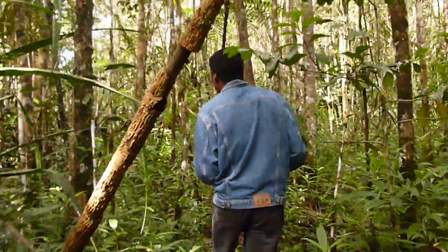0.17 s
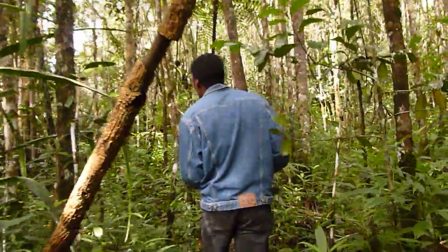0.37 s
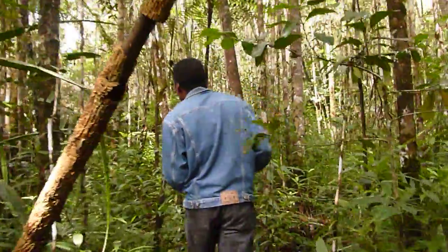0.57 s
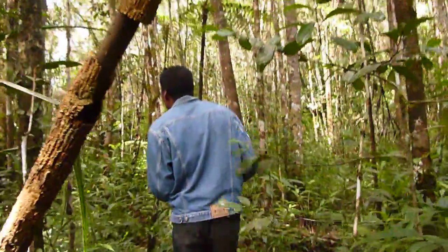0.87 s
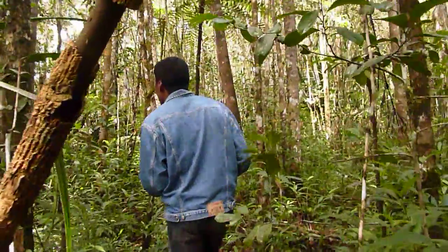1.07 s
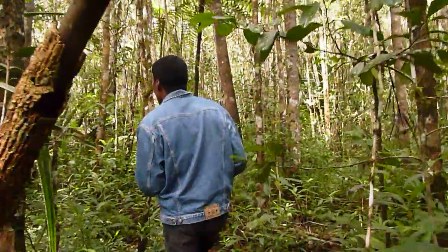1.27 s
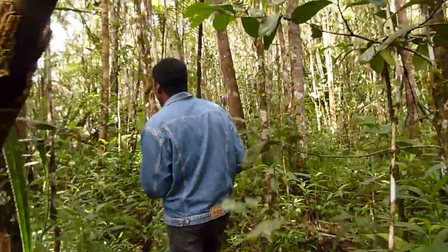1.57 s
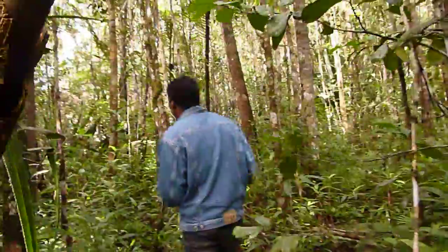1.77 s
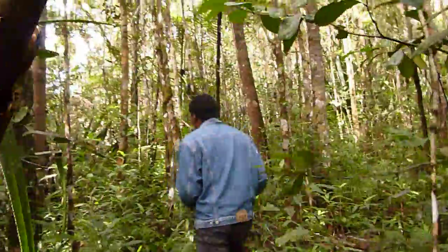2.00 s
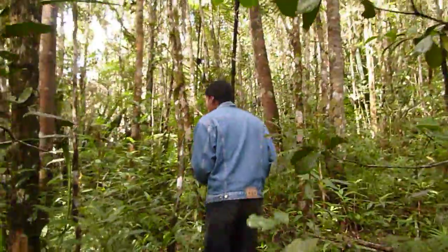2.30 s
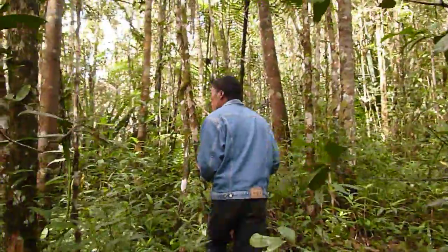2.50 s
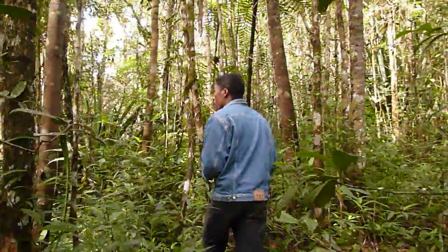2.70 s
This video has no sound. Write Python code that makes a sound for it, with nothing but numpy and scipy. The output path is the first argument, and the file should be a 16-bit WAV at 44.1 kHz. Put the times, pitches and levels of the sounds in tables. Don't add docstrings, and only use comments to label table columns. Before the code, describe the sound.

Two lemurs honk loudly in a forest. A low grunt at 0.14 s leads to a harsh honk at 0.33 s; a bird ticks once there. Near 0.7, 1.1 and 1.5 s, paired honks overlap, hoarse and strained, with grunts between. Breathier gasps precede clearer single honks at 1.9 and 2.3 s. Trunks echo densely; leaf rustle and faint rumble fade, heard through a dull camera microphone.

```python
import sys
import numpy as np
from scipy import signal
from scipy.fft import rfft, irfft
from scipy.io import wavfile
from scipy.ndimage import uniform_filter1d

SR = 44100
rng = np.random.default_rng(int(sys.argv[2]) if len(sys.argv) > 2 else 0)


def undo_db(level):
    steps = np.asarray(level, float) / 20
    return 10 ** steps


def int16_out(signal):
    q = np.round(np.clip(np.atleast_2d(signal).T, -1, 1) * 32767)
    wavfile.write(sys.argv[1], SR, q.astype(np.int16))


N = 125685

# [hz, level_db per Hz]
LEAF_COLOR = [(30, -25), (120, -2), (300, 3.5), (1100, 4), (2400, -4), (4200, -5.5), (6500, -4.5),
              (8000, -5.5)]
# [time_s, level_db]
RUSTLE_LEVEL = [(0, -39.5), (0.101, -39.5), (.3, -44), (1.5, -46.5), (2.6, -50.5), (2.85, -53)]
RUMBLE_DB, RUMBLE_HZ = -68, 130

# [start_s, length_s, pitch_hz, level_db, roughness 0-1]
GRUNTS = [
    (.14, .19, 103.4, -34, .8),
    (0.504, 0.2, 93.96, -37.5, .75),
    (0.889, 0.2, 92.65, -37.5, .75),
    (1.28, 0.21, 93, -38, .75),
]
# [start_s, length_s, pitch_hz, level_db, roughness 0-1]
GASPS = [
    (1.67, .2, 95, -42, .9),
    (2.12, .185, 97, -43, .97),
]
# [hz, width_hz, level_db]
GRUNT_THROAT = [(200, 110, -8), (300, 126, -7), (438, 200, -11), (715, 190, 0), (1194, 190, -1),
                (1900, 760, -16)]
# [hz, width_hz, level_db]
GASP_THROAT = [(200, 120, -6), (310, 150, -2), (480, 250, -3), (800, 300, 0), (1200, 400, -10)]
# [multiple of pitch, level_db]
CHEST_HUM = [(2, 2), (3, -4), (4, -12)]
GRUNT_EDGE_S, GRUNT_SAG, GRUNT_JITTER = .03, .04, .05

# [hz, seconds to fall 60 dB]
ECHO_T60 = [(200, 0.86), (700, .95), (1300, .8), (2000, .9), (5000, .75)]
# [hz, level_db]
ECHO_GAIN = [(200, -14), (700, -8), (1300, -8), (2000, -5), (5000, 1)]
ECHO_RISE_S, ECHO_GAP_S = 0.034, 0.013
SLOPE_DELAY_S, SLOPE_DB = .19, -21

# [center_s, pitch_hz, length_s, level_db]
BIRD_TICK = (.325, 6500, .011, -41)

# [start_s, length_s, pitch_hz, level_db, octave_db]
HARSH_HONKS = [
    (.328, .116, 692, -17, -6),
    (.716, .12, 691, -19.5, -7),
    (1.1, .12, 689, -18.5, -6),
    (1.502, .115, 689.4, -17, -3),
]
# [start_s, length_s, pitch_hz, level_db, octave_db]
CLEAR_HONKS = [
    (.662, .155, 654.1, -16, -10),
    (1.062, .16, 659, -20.5, -6),
    (1.464, .19, 661, -24, 0),
    (1.88, .17, 663, -19.5, -9),
    (2.301, .195, 660.1, -22, 4),
]
# [multiple of pitch, level_db]
HARSH_PARTIALS = [(1, 1), (2, 0.5), (3, -1), (4, -20.5), (5, -14.5), (6, -24.5), (7, -17.5), (8, -22.5),
                  (9, -31), (10, -28.5), (11, -35)]
# [multiple of pitch, level_db]
CLEAR_PARTIALS = [(.5, -32), (1, 1), (1.5, -42), (2, 0.5), (2.5, -30.5), (3, -2), (3.5, -35.5), (4, -14),
                  (5, -19), (6, -22), (6.5, -28), (7, -23), (7.5, -34), (8, -28), (8.5, -34), (9, -22),
                  (9.5, -28), (10, -23), (10.5, -36), (11, -22)]
# [multiple of pitch, level_db]
SIDE_TONES = [(1.64, -17.5), (2.11, -13), (3.11, -16), (3.28, -17)]
# [rise_s, release_s, start pitch share, glide_s, end sag share, fade_db,
# onset roughness 0-1, its decay_s, held roughness 0-1, jitter share, upper partials_db]
HARSH_WAY = (.022, 0.01, .96, 0.03, .035, -8, .92, .022, .1, .008, 0)
STRAINED_WAY = (.022, .025, .95, .008, .03, -8, .97, .03, .2, .009, -1)
HOARSE_WAY = (.018, .03, .86, .007, .025, -7, .5, .018, .09, .0045, -4)
CLEAR_WAY = (.04, .025, .76, .011, 0.06, -8, .65, .02, .03, .0008, 0)
# [hz, width_hz, level_db]
RASP = [(396, 390, -15), (754, 400, -3.5), (1140, 480, 2), (1667, 720, -4), (2133, 530, -4),
        (3430, 650, -15), (4580, 900, -15), (6450, 2200, -18)]
BLOOM_S = .01
OPENING_DB = 9

# [hz, width_hz]
MOTOR_NOTCHES = [(3000, 550), (5200, 310)]
# [hz, level_db]
CONVERTER_ROLL = [(7100, 1), (7600, -8.5), (7880, -25), (8000, -59), (8120, -36), (8450, -18),
                  (8900, -30.5), (9200, -69.5)]
RATE_HZ, LOW_CUT_HZ = 16000, 30
KNEE_DB, SQUEEZE, RECOVER_DB_PER_S = -24, .25, 60


def read(points, hz):
    f, value = np.transpose(points)
    return np.interp(np.log(hz + 1), np.log(f + 1), value)


def evened(x):
    return x / np.sqrt(np.mean(x ** 2) + 1e-20)


def add(mix, start_s, sound):
    part = mix[round(start_s * SR):][:len(sound)]
    part += sound[:len(part)]


def resonate(x, bands):
    out = 0
    for k, (hz, width_hz, db) in enumerate(bands):
        b, a = signal.iirpeak(hz, hz / width_hz, SR)
        once = signal.lfilter(b, a, x)
        out = out + (-1) ** k * undo_db(db) * signal.lfilter(b, a, once)
    return evened(out)


def wander(n, size):
    smooth = uniform_filter1d(rng.standard_normal(n), size)
    return evened(uniform_filter1d(smooth, size))


def leaves():
    frames, hz = N // 128 + 5, np.fft.rfftfreq(512, 1 / SR)
    real, imag, patches = rng.standard_normal((frames, 257, 3)).T
    patches = uniform_filter1d(patches, 10, 0)
    patches = evened(uniform_filter1d(patches, 14, 1))
    spectrum = (real + 1j * imag) * undo_db(read(LEAF_COLOR, hz)[:, None] + 1.5 * patches)
    rustle = evened(signal.istft(spectrum, nperseg=512, noverlap=384)[1][:N])
    level_db = np.interp(np.arange(N) / SR, *np.transpose(RUSTLE_LEVEL))
    low_pass = signal.butter(2, RUMBLE_HZ, fs=SR, output="sos")
    rumble = signal.sosfilt(low_pass, rng.standard_normal(N))
    return rustle * undo_db(level_db) + undo_db(RUMBLE_DB) * evened(rumble)


def grunt(start_s, length_s, pitch_hz, db, rough, throat):
    n = int(.3 * SR)
    t = np.arange(n) / SR
    sagging_hz = pitch_hz * (1 + GRUNT_SAG * (1 - 2 * t / length_s))
    turns = np.cumsum(sagging_hz * (1 + GRUNT_JITTER * rough * wander(n, size=300))) / SR
    pulses = sum(np.cos(2 * np.pi * k * turns) for k in range(1, 24))
    puffs = rng.standard_normal(n) * (.8 + np.exp(-(turns % 1) / .4))
    shape = np.clip(np.minimum(t, length_s - t) / GRUNT_EDGE_S, 0, 1)
    shape = shape * undo_db(2.1 * wander(n, size=500))
    steady = np.cumsum(sagging_hz * (1 + .01 * wander(n, size=900))) / SR
    hum = sum(undo_db(d) * 2 * np.cos(2 * np.pi * k * steady) for k, d in CHEST_HUM)
    voice = resonate((1 - rough) * evened(pulses) + rough * evened(puffs), throat)
    return start_s, undo_db(db) * shape * ((1 - rough) * hum + voice)


def forest_echo(x):
    hz, t, noise = signal.stft(rng.standard_normal(int(1.5 * SR)), SR, nperseg=256)
    decay = undo_db(-60 * t / read(ECHO_T60, hz)[:, None])
    build = 1 - np.exp(-np.maximum(t - ECHO_GAP_S, 0) / ECHO_RISE_S)
    shape = decay * build
    shape *= undo_db(read(ECHO_GAIN, hz)[:, None]) / np.linalg.norm(shape, axis=1, keepdims=True)
    tail = signal.istft(noise * shape, SR, nperseg=256)[1] / np.sqrt(128)
    return signal.fftconvolve(x, tail)[:N]


def bird():
    center_s, pitch_hz, length_s, db = BIRD_TICK
    t = np.arange(N) / SR - center_s
    return undo_db(db) * np.exp(-(t / length_s) ** 2) * np.sin(2 * np.pi * pitch_hz * t)


def honk(row, partials, way):
    start_s, length_s, pitch_hz, db, octave_db = row
    rise_s, release_s, share, glide_s, sag, fade_db, rough_start, calm_s, rough, jitter, top_db = way
    n = int(.3 * SR)
    t = np.arange(n) / SR
    glide = (1 - share) * np.exp(-t / glide_s)
    end_sag = sag * np.exp(np.minimum(t - length_s, 0) / .015)
    bend = 1 - glide - end_sag
    shake = rough + (rough_start - rough) * np.exp(-t / calm_s)
    turns = np.cumsum(pitch_hz * bend * (1 + jitter * wander(n, size=150))) / SR
    tone = np.zeros(n)
    for k, d in partials:
        opening_db = OPENING_DB * t / length_s * (1 < k < 2.2)
        level_db = d + octave_db * (k == 2) + opening_db + top_db * (k > 3.4)
        level_db = level_db + 2.4 * wander(n, size=1300)
        bloom = np.clip(t / (k * BLOOM_S), 0, 1) ** 2
        tone += undo_db(level_db) * bloom * -np.cos(2 * np.pi * k * turns)
    bursts = rng.standard_normal(n) * (.3 + np.exp(-(turns % 1) / 0.23))
    rasp = resonate(bursts * undo_db(4 * wander(n, size=120)), RASP)
    edges = np.clip(np.minimum(t / rise_s, (length_s - t) / release_s), 0, 1)
    shape = np.sin(np.pi / 2 * edges) ** 2
    voice = np.sqrt(2) * (1 - shake) * tone + shake * rasp
    return start_s, undo_db(db + fade_db * t / length_s) * shape * voice


def far_slope(honks):
    answer = np.zeros(N)
    add(answer, SLOPE_DELAY_S, undo_db(SLOPE_DB) * honks)
    return answer


def scene():
    harsh, clear = np.zeros(N), np.zeros(N)
    add(harsh, *honk(HARSH_HONKS[0], HARSH_PARTIALS, HARSH_WAY))
    for row in HARSH_HONKS[1:]:
        add(harsh, *honk(row, HARSH_PARTIALS + SIDE_TONES, STRAINED_WAY))
    for row in CLEAR_HONKS[:3]:
        add(clear, *honk(row, CLEAR_PARTIALS, HOARSE_WAY))
    for row in CLEAR_HONKS[3:]:
        add(clear, *honk(row, CLEAR_PARTIALS, CLEAR_WAY))
    answer = far_slope(harsh + clear)
    for row in GRUNTS:
        add(harsh, *grunt(*row, GRUNT_THROAT))
    for row in GASPS:
        add(clear, *grunt(*row, GASP_THROAT))
    harsh += bird()
    echoes = forest_echo(harsh) + forest_echo(clear)
    return (harsh + clear + answer + echoes + leaves())[None]


def top_cut(x):
    return signal.sosfilt(signal.butter(12, 9070, fs=SR, output="sos"), x)


def record(dry):
    power_db = 10 * np.log10(abs(uniform_filter1d(dry[0] ** 2, size=400)) + 1e-12)
    fall_db = np.arange(N) * RECOVER_DB_PER_S / SR
    held_db = np.maximum.accumulate(power_db + fall_db) - fall_db
    over_db = np.maximum(held_db - KNEE_DB, 0)
    leveled = dry / undo_db(SQUEEZE * uniform_filter1d(over_db, size=300))
    hz = np.fft.rfftfreq(N, 1 / SR)
    gain = (hz < RATE_HZ / 2) * hz ** 2 / (hz ** 2 + LOW_CUT_HZ ** 2)
    for notch_hz, width_hz in MOTOR_NOTCHES:
        gap = hz ** 2 - notch_hz ** 2
        gain = gain * gap / (gap - 1j * hz * width_hz)
    x = irfft(rfft(leveled) * gain, N)
    x = x * (1 + 2 * np.cos(2 * np.pi * RATE_HZ * np.arange(N) / SR))
    x = irfft(rfft(x) * undo_db(read(CONVERTER_ROLL, hz)) * (hz < 9250), N)
    return top_cut(x)


dry = scene()
out = record(dry)
int16_out(out)
```